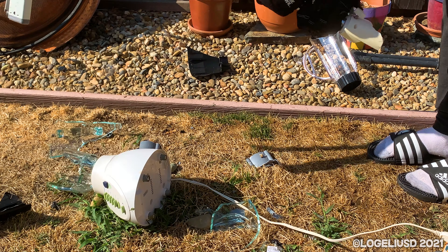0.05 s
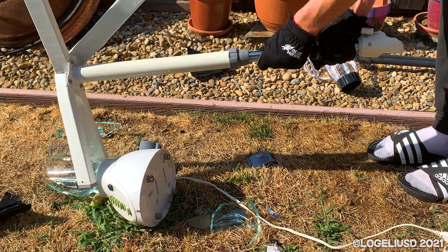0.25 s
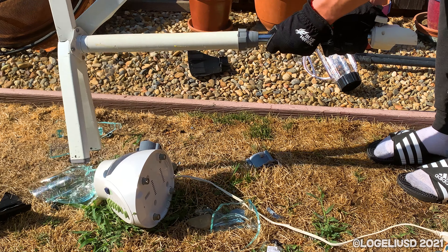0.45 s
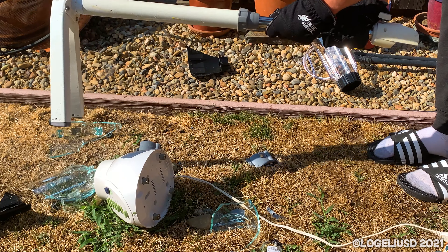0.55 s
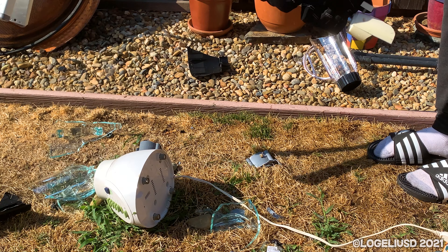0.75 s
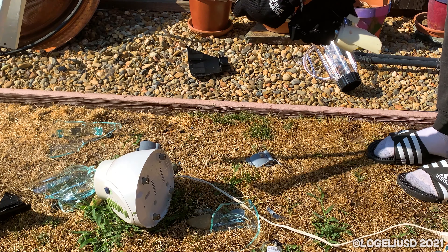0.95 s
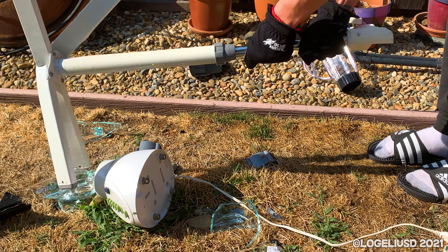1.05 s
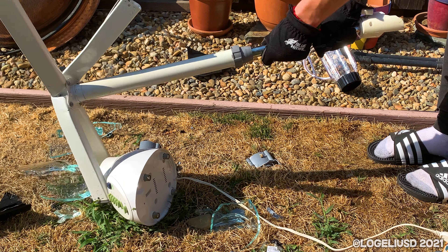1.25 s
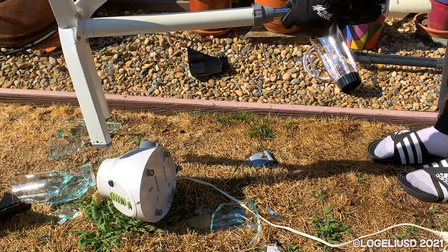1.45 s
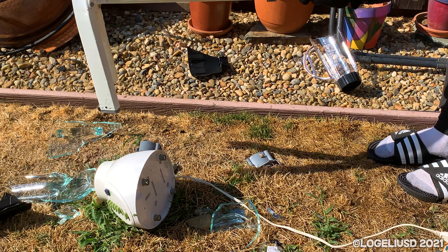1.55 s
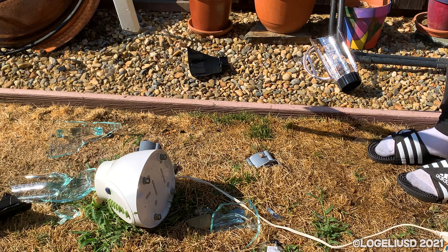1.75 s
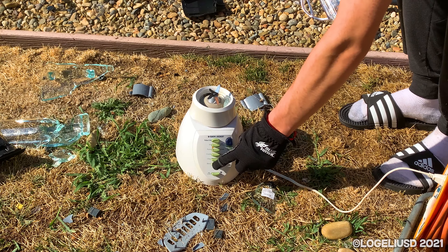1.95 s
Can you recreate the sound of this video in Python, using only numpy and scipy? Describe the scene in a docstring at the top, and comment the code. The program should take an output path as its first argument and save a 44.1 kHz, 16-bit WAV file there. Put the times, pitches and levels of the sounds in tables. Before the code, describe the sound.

Shards of glass clink and rattle close by after each of two blows from a metal tool on a plastic base on the ground. Each blow is a sharp, hollow knock with a crunch, over low outdoor noise.

```python
"""A dry lawn: low outdoor noise and a distant hum throughout; loose glass splinters crackle faintly.
At 0.2 s a metal tool strikes a plastic appliance base lying in broken glass: the hollow shell knocks,
the base thuds on the soil, splinters crunch. A large piece of glass clinks and chatters against the
tool, each clink favouring other modes. At 1.1 s a second blow, with more clinks and chatter.
At 1.9 s a soft gust."""
import sys
import numpy as np
from scipy import signal
from scipy.fft import rfft, irfft
from scipy.io import wavfile
from scipy.ndimage import uniform_filter1d

SR = 44100
rng = np.random.default_rng(int(sys.argv[2]) if len(sys.argv) > 2 else 0)


def bounce(signal):
    """Save signal as a 16-bit WAV file at the path given by the first command-line argument."""
    frames = np.transpose(np.atleast_2d(signal))
    limited = np.clip(frames, -1, 1)
    pcm = np.round(limited * 32767).astype(np.int16)
    wavfile.write(sys.argv[1], SR, pcm)


N = 88200

# outdoor air spectrum: f/Hz, relative level/dB
AIR_SPECTRUM = [(12, -32), (20, -21.5), (49, 3), (77, -9), (107, -4.5), (228, -14), (319, -18.5),
                (347, -19.5), (642, -21), (718, -24), (1120, -23), (1860, -29.5), (6180, -37.5),
                (12800, -49.5), (16000, -58)]
# dip and recovery of the air about AIR_DB: t/s, level/dB
AIR_DUCK = [(0, 3), (.18, 0), (.65, -1), (1.05, -0.5), (1.65, -3.5), (1.85, 0.5), (2, 2)]
# tones of a distant machine: f/Hz, level/dB
HUM_TONES = [(118, -51.5), (350, -55.5), (409, -56), (646, -65.5), (700, -75), (759, -61.5), (1114, -58.5)]
# gust spectrum: f/Hz, relative level/dB
GUST_SPECTRUM = [(20, -25), (40, -20), (58, 7), (100, -18), (170, -20), (400, -27.5), (2000, -44),
                 (8000, -61), (16000, -93)]
# spectrum of splinters and ticks: f/Hz, relative level/dB
SPLINTER_SPECTRUM = [(100, -22), (700, -44), (1400, 2), (2500, -0.5), (5000, 0), (7500, -2.5), (10000, -6),
                     (12000, -13), (15500, -10.5)]
# loose splinters: t/s, level/dB, decay/s
CRACKLE_EVENTS = [(0.028, -42.5, 0.0084), (0.059, -42, 0.0092), (.405, -27, 0.012), (.89, -51, .005),
                  (.985, -56, .008)]
# large piece of glass: f/Hz, relative level/dB, base T60/s
GLASS_MODES = np.column_stack([ [1820, 2546, 2962, 3440, 3760, 4772, 5036, 5936, 6283, 6686, 7590, 8085, 8190, 9017, 9703, 10114, 10381, 10906, 12940, 13600, 14480, 14870, 15730],
               [-1, -3, 1, 2, 1, 2, -2, -2, -2, 0, 2, -4, -2, -2, -2, -3, -4, -6, -8, -9, -7, -6, -11],
               [.2, .24, .19, .24, .17, .2, .18, .14, .14, .14, .17, .13, .15, .16, .14, .16, .17, .12, .14, .1, .11, .11, .1]])
# glass chattering along the tool: t/s, length/s, ring/dB, grit/dB
CHATTER_EVENTS = [(0.215, 0.063, -23.5, -28), (.295, .11, -28, -40), (0.424, .1, -29, -31),
                  (.525, 0.022, -36, -56), (1.086, 0.089, -28, -23), (1.2, 0.17, -37.5, -50),
                  (1.369, 0.044, -26, -48), (1.515, 0.021, -34, -35)]
# glass hitting the tool: t/s, ring/dB, tick/dB, T60 factor, 3 x (favoured mode f/Hz, level/dB)
CLINK_EVENTS = [(0.235, -43, -24, 1.1, 2546, -18, 6283, -19.5, 8085, -30),
                (0.264, -59, -32, 1.07, 5936, -20.5, 4770, -23.5, 7590, -41),
                (0.299, -51, -23, 0.77, 2546, -24.5, 4770, -27, 3765, -44),
                (.3135, -59, -14, 1.08, 3765, -10, 6686, -18.5, 6283, -21.5),
                (0.33, -43, -33, 0.55, 8190, -27, 9017, -26, 13600, -30),
                (.3495, -29, -32, 0.43, 3765, -12, 6686, -13, 7590, -28),
                (0.355, -38, -12, 0.9, 4770, -20, 2965, -26.5, 9705, -30.5),
                (.4195, -67, -33, 0.29, 5040, -13, 3440, -16, 3765, -16.5),
                (0.42, -66, -24, 0.8, 2965, -15.5, 9017, -20.5, 10114, -23),
                (.456, -67, -26, 1.38, 3440, -26.5, 10381, -25, 3765, -26.5),
                (.479, -42, -31, 1.2, 10381, -34, 6686, -35, 1820, -62),
                (.504, -55, -25, 0.23, 3440, -23.5, 4770, -43, 7590, -45),
                (0.777, -56, -35, 0.73, 10381, -38, 10114, -44, 9017, -45),
                (0.795, -51, -40, 0.27, 2965, -31, 7590, -45, 6686, -45),
                (0.9063, -53.5, -41, 0.52, 1820, -43.5, 10381, -47.5, 8190, -51),
                (1.168, -38, -24, 1.3, 3440, -28.5, 9705, -26.5, 12940, -33),
                (1.186, -48.5, -34, 1.94, 10906, -28, 6686, -38, 13600, -30),
                (1.2098, -38, -34, 0.66, 4770, -23, 8190, -23.5, 14480, -36),
                (1.255, -43.5, -42, 2.1, 3765, -56, 5936, -33.5, 10114, -39),
                (1.294, -41.5, -33, 0.62, 3440, -24.5, 5936, -23, 6686, -32),
                (1.3718, -58, -15, 0.77, 2546, -18, 5040, -18.5, 14870, -23.5),
                (1.3733, -36, -32, 0.54, 5936, -12.5, 6686, -22, 4770, -23.5),
                (1.394, -54, -20, 0.74, 10906, -16, 3765, -23, 9705, -25),
                (1.402, -36, -12, 0.76, 2965, -23, 8085, -25, 3440, -33),
                (1.486, -47.5, -32, 1, 2546, -35, 1820, -38.5, 7590, -40.5),
                (1.5082, -44.5, -48, 0.36, 2546, -24.5, 8190, -36, 14870, -38),
                (1.5208, -59, -29.5, 0.62, 1820, -34, 2965, -24.5, 3765, -28),
                (1.527, -55.5, -32, 1.13, 3440, -32.5, 2546, -35, 5040, -34.5)]
# whole base on the soil: f/Hz, relative level/dB, T60/s
THUD_MODES = [(170, -9, 0.068), (249, -21, 0.069), (357, 1.5, 0.062), (398, 2, 0.062), (453, 1, 0.045),
              (526, -12, 0.085), (814, -15, .04)]
# plastic shell: f/Hz, relative level/dB, T60/s
SHELL_MODES = [(1250, -27, .05), (1296, 3, 0.13), (1350, 7.5, 0.076), (1407, -0.5, 0.13), (1506, 9, 0.041),
               (1596, 4, 0.037), (1774, 6, 0.022), (1952, -5, 0.15), (2025, 0, 0.098), (2400, -16, .03)]
# contacts of the two blows: t/s, shell/dB, thud/dB, crack/dB, splinters/dB, crunch decay/s
BLOW_CONTACTS = [(0.2045, -18, -34, -7, -16.5, 0.011), (0.223, -22, -31, -26, -15.5, .018),
                 (0.24, -24.5, -41, -28, -43, 0.028), (0.252, -23, -30.5, -31, -33, 0.0072),
                 (.267, -22.5, -31.5, -33, -40, 0.026), (0.358, -29.5, -36.5, -48, -45, 0.02),
                 (.44, -40, -37.5, -48, -46, 0.019), (1.087, -17.5, -49, -10.5, -19, 0.012),
                 (1.1071, -10.5, -22.5, -12.5, -11.5, 0.0062), (1.122, -15.5, -37, -27, -30, 0.031),
                 (1.141, -25, -28.5, -32, -33, 0.024), (1.1488, -16.5, -27, -27, -23.5, 0.024),
                 (1.176, -29, -49, -39, -42, .012), (1.2688, -14.5, -29, -20, -28, 0.0053),
                 (1.276, -21.5, -33.5, -28, -43, 0.011)]

AIR_DB, HUM_WANDER_HZ = -39.5, 2.46
GUST_PEAK_S, GUST_SIGMA_S, GUST_DB = 1.917, 0.063, -32
DETUNE_HZ, TWIN_SPREAD_HZ, TWIN_DB = 4, 29.4, -5.5
RING_DECAY_SHAPE = 1.176  # above 1: the ring holds, then dies away ever faster
CHATTER_PER_S, CHATTER_SPREAD_DB, CHATTER_T60_FACTOR, CHATTER_DB_PER_OCTAVE = 900, 5, 0.5, -1.5
CRUNCH_PER_S, CRUNCH_SPREAD_DB = 5600, 4.5
SPLINTER_DECAY_S, TICK_DECAY_S, CRACK_DECAY_S = 0.00068, 0.0012, 0.0021


def undb(db):
    return 10 ** (np.asarray(db) / 20)


def unit_rms(x):
    return x / np.sqrt(np.mean(x ** 2) + 1e-20)


def since(start_s):
    """Seconds since start, zero before."""
    return np.maximum(np.arange(N) - int(start_s * SR), 0) / SR


def fade(start_s, decay_s):
    """Sudden start, exponential decay."""
    t = since(start_s)
    return (t > 0) * np.exp(-t / max(decay_s, 1e-4))


def through(force, response):
    """Convolve with a response scaled to unit energy."""
    return signal.fftconvolve(force, response / np.linalg.norm(response))[:N]


def colour(x, spectrum):
    """Shape the spectrum, keeping the power of white noise."""
    hz, db = np.array(spectrum).T
    bins_hz = np.maximum(np.arange(N // 2 + 1) * SR / N, 1)
    gain = undb(np.interp(np.log(bins_hz), np.log(hz), db))
    return irfft(rfft(x) * unit_rms(gain), N)


def high_pass(x, hz):
    """A small body radiates little bass."""
    return signal.sosfilt(signal.butter(2, hz, "high", fs=SR, output="sos"), x)


def ring(modes, decay_shape=1, phase_rad=0):
    """Decaying modes, slightly detuned on each call."""
    t = np.arange(SR // 4) / SR
    hz, db, t60_s = np.array(modes).T[:, :, None]
    hz = hz + DETUNE_HZ * rng.standard_normal(hz.shape, dtype=np.float32)
    decay = undb(-60 * (t / np.maximum(t60_s, 1e-3)) ** decay_shape)
    return (undb(db) * decay * np.sin(2 * np.pi * hz * t + phase_rad)).sum(0)


def clicks(per_s, spread_db):
    """Random tiny impacts of uneven size, rms 1."""
    impacts = (rng.random(N) < per_s / SR) * rng.choice([-1, 1], N)
    return unit_rms(impacts * undb(spread_db * rng.standard_normal(N)))


def air():
    """Low outdoor noise that dips after the blows and recovers, as with automatic gain."""
    duck_db = np.interp(since(0), *np.array(AIR_DUCK).T)
    return undb(AIR_DB + duck_db) * colour(rng.standard_normal(N), AIR_SPECTRUM)


def hum():
    """Distant machine: each tone wavers in pitch."""
    out = np.zeros(N)
    for hz, db in HUM_TONES:
        wander_hz = HUM_WANDER_HZ * unit_rms(uniform_filter1d(rng.standard_normal(N), size=4000))
        out += undb(db) * np.sqrt(2) * np.sin(2 * np.pi * np.cumsum(hz + wander_hz) / SR)
    return out


def gust():
    """One soft gust rumbles on the microphone."""
    swell = np.exp(-((since(0) - GUST_PEAK_S) / GUST_SIGMA_S) ** 2 / 2)
    return undb(GUST_DB) * swell * colour(rng.standard_normal(N), GUST_SPECTRUM)


def splinters(envelope):
    """Dense tiny impacts, each a short bright crack."""
    force = envelope * clicks(CRUNCH_PER_S, CRUNCH_SPREAD_DB)
    t = np.arange(SR // 50) / SR
    crack = rng.standard_normal(len(t)) * np.exp(-t / SPLINTER_DECAY_S)
    return colour(through(force, crack), SPLINTER_SPECTRUM)


def crackles():
    """Loose splinters crackle in brief bursts."""
    return splinters(sum(undb(db) * fade(start_s, decay_s) for start_s, db, decay_s in CRACKLE_EVENTS))


def glass_ring(modes):
    """Uneven glass: each mode beats against a weaker twin."""
    twins = modes + [0, TWIN_DB, 0]
    twins[:, 0] += TWIN_SPREAD_HZ * rng.standard_normal(len(modes))
    return ring(modes, RING_DECAY_SHAPE) + ring(twins, RING_DECAY_SHAPE, np.pi / 2)


def chatter():
    """Quick light contacts keep the glass ringing; grit grinds under it."""
    drive, grit = np.zeros((2, N))
    for start_s, length_s, ring_db, grit_db in CHATTER_EVENTS:
        t = since(start_s)
        contact = (t > 0) * np.exp(-(t / length_s) ** 6)
        drive += undb(ring_db) * contact
        grit += undb(grit_db) * contact
    modes = np.array(GLASS_MODES) * [1, 1, CHATTER_T60_FACTOR]
    modes[:, 1] += CHATTER_DB_PER_OCTAVE * np.log2(modes[:, 0] / modes[0, 0])
    response = glass_ring(modes)
    force = drive * clicks(CHATTER_PER_S, CHATTER_SPREAD_DB)
    return through(force, response) + splinters(grit)


def clinks():
    """A tick, then the glass rings; the contact point favours three modes."""
    rings, tick_envelope = np.zeros((2, N))
    for start_s, ring_db, tick_db, t60_factor, *favoured in CLINK_EVENTS:
        modes = np.array(GLASS_MODES) * [1, 1, t60_factor] + [0, ring_db, 0]
        for hz, db in zip(favoured[::2], favoured[1::2]):
            nearest = np.argmin(abs(modes[:, 0] - hz))
            modes[nearest, 1] = db
        sound = glass_ring(modes)
        onset = int(start_s * SR)
        rings[onset:onset + len(sound)] += sound
        tick_envelope += undb(tick_db) * fade(start_s, TICK_DECAY_S)
    ticks = colour(tick_envelope * rng.standard_normal(N), SPLINTER_SPECTRUM)
    return rings + high_pass(ticks, hz=1370)


def blows():
    """An impulse and a dying crunch drive the shell and the base on the soil; splinters crack."""
    shell_force, thud_force, crack_envelope, crunch_envelope = np.zeros((4, N))
    for start_s, shell_db, thud_db, crack_db, splinter_db, decay_s in BLOW_CONTACTS:
        envelope = fade(start_s, decay_s)
        force = envelope * clicks(CRUNCH_PER_S, CRUNCH_SPREAD_DB)
        force[int(start_s * SR)] += 0.66 * np.linalg.norm(force)  # first contact
        shell_force += undb(shell_db) * force
        thud_force += undb(thud_db) * force
        crack_envelope += undb(crack_db) * fade(start_s, CRACK_DECAY_S)
        crunch_envelope += undb(splinter_db) * envelope
    knock = high_pass(through(shell_force, ring(SHELL_MODES)), hz=1050)
    thud = high_pass(through(thud_force, ring(THUD_MODES)), hz=210)
    cracks = colour(crack_envelope * rng.standard_normal(N), SPLINTER_SPECTRUM)
    return knock + thud + cracks + splinters(crunch_envelope)


def scene():
    return (blows() + clinks() + chatter() + air() + hum() + gust() + crackles())[None]


def record(dry):
    """Soft clip, then low-pass."""
    ceiling, top_hz = 0.71, 15800
    rounded = ceiling * np.tanh(dry / ceiling)
    return signal.sosfilt(signal.ellip(8, .2, 70, top_hz, fs=SR, output="sos"), rounded)


dry = scene()
out = record(dry)
bounce(out)
```